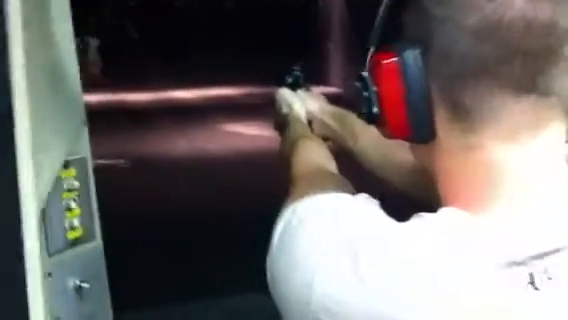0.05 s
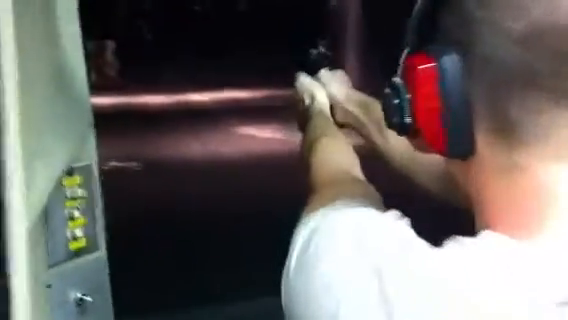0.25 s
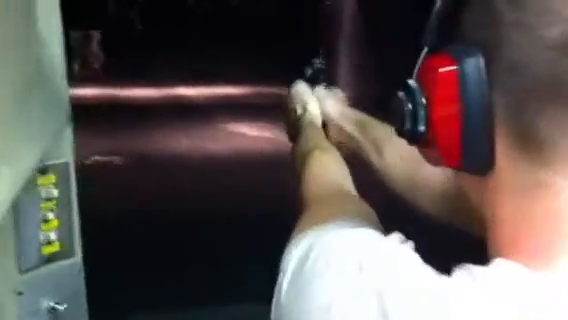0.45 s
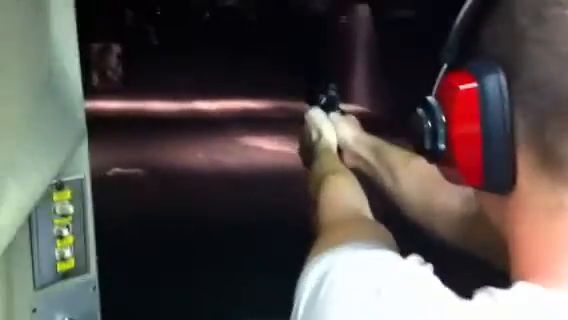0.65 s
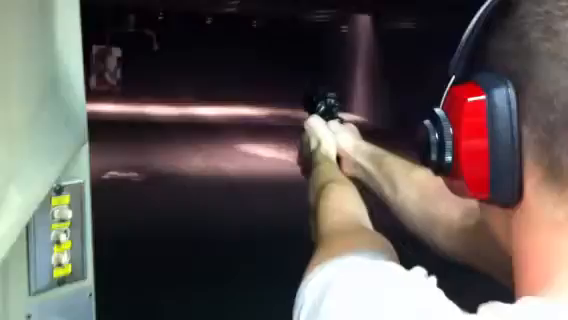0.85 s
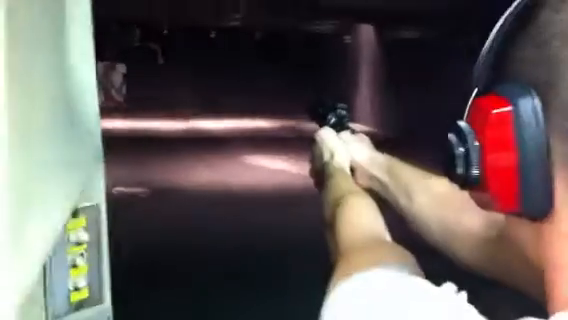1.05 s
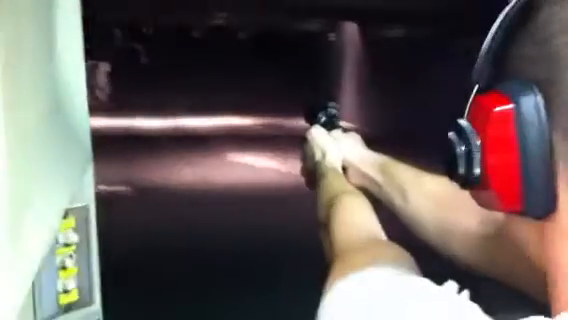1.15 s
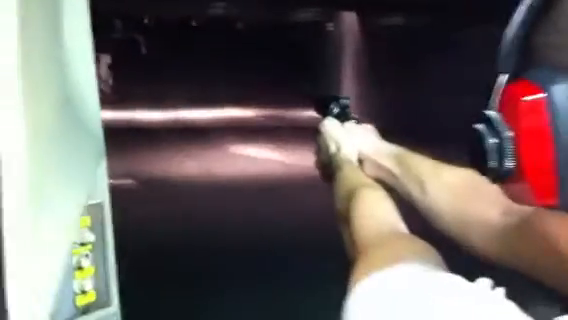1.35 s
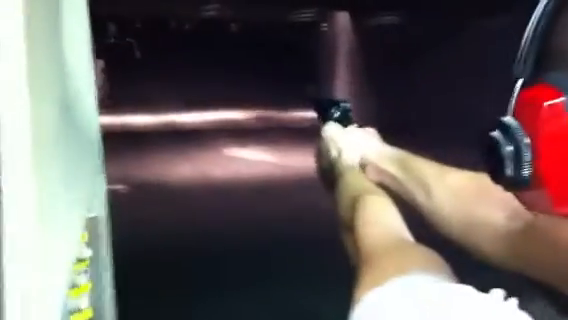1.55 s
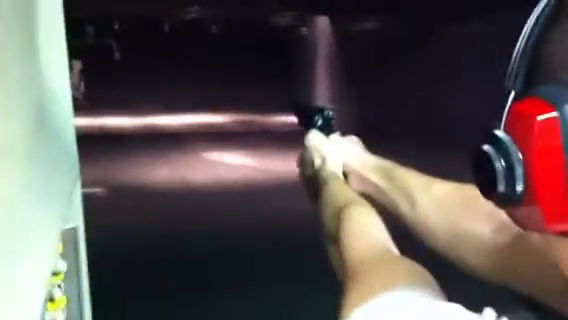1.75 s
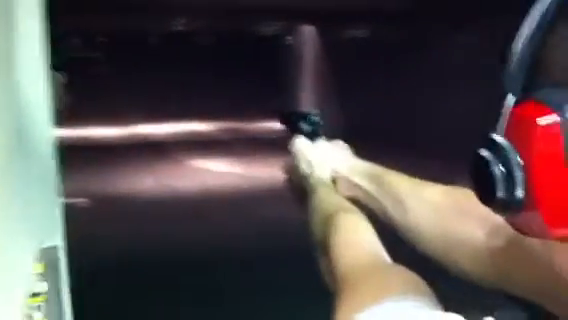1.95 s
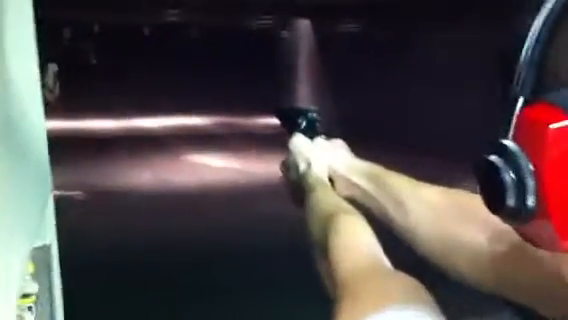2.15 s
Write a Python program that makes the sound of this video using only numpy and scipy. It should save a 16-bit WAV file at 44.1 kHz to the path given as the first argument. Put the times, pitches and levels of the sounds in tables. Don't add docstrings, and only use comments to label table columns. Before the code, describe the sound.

A single handgun shot in a long concrete indoor range, heard close on an overloaded phone microphone. Low ventilation hum runs throughout. Steel lock parts tick at about 0.19-0.24 s, then the blast cracks at 0.24 s. A bright backstop echo follows near 0.37 s; the fluttering roar decays into hollow low-mid tones. Faint brass case bounces tinkle from 1 s, with clearer ticks around 1.75 s.

```python
import sys
import numpy as np
from scipy import signal
from scipy.fft import irfft
from scipy.io import wavfile
from scipy.ndimage import uniform_filter1d

SR = 44100
rng = np.random.default_rng(int(sys.argv[2]) if len(sys.argv) > 2 else 0)


def makeup_ratio(level_db):
    decades = np.asarray(level_db, float) / 20
    return 10 ** decades


def inscribe(sig):
    pcm = np.round(np.clip(np.atleast_2d(sig).T, -1, 1) * 32767)
    wavfile.write(sys.argv[1], SR, pcm.astype(np.int16))


N = 97020

SHOT_S = 0.2425
BUILD_S = 0.17


def unit(x):
    return x / np.sqrt(np.mean(x ** 2))


def read(table, hz):
    rows = np.array(table)
    return np.interp(np.log(hz), np.log(rows[:, 0]), rows[:, 1])


def band(hz, width, lines_db=0.0):
    f = np.fft.rfftfreq(N, 1 / SR)
    cells = rng.standard_normal(SR // 4)[(f / 6).astype(int)]
    real, imaginary = rng.standard_normal((2, len(f)))
    bell = np.exp(-0.5 * ((f - hz) / width * 2) ** 2)
    return unit(irfft((real + 1j * imaginary) * makeup_ratio(lines_db * cells) * bell, N))


def walk(rate):
    k = int(SR / rate)
    x = np.repeat(rng.standard_normal(N // k + 1), k)
    for _ in range(2):
        x = uniform_filter1d(x, k)
    return unit(x[:N])


def fade(since, t60):
    return (since >= 0) * np.exp(-np.log(1000) * np.maximum(since, 0) / t60)


def struck(times, db, t60):
    kicks = np.zeros(N)
    kicks[(times * SR).astype(int)] = makeup_ratio(db)
    return signal.lfilter([1], [1, -np.exp(-np.log(1000) / (t60 * SR))], kicks)


# frequency in Hz, level in dB per Hz.
AIR_RUSH = [(40, -30.5), (90, -13), (150, -5.5), (320, -14), (450, -20.5), (1000, -24.5), (3000, -37),
            (16000, -45)]
# frequency in Hz, width in Hz, level in dB.
DUCT_HUMS = [(150, 16, -60.5), (228, 18, -65), (311, 52, -57), (465, 14, -68.5)]


def ventilation():
    air = 0
    for hz in 40 * 2 ** (np.arange(18) / 2):
        level_db = read(AIR_RUSH, hz) + 10 * np.log10(hz) + 0.86 * walk(21)
        air = air + makeup_ratio(level_db) * band(hz, hz / 2)
    out = makeup_ratio(-56) * unit(air)
    for hz, width, db in DUCT_HUMS:
        out = out + makeup_ratio(db + 0.89 * walk(11)) * band(hz, width)
    return out


# frequency in Hz, level in dB, time to fade 60 dB in seconds, wavering in Hz.
CASE_TONES = [(6160, -16, .4, 80), (7102, -14, 0.44, 40), (8140, -8, 0.46, 35), (9730, -1, 0.41, 70),
              (11920, -1.5, .7, 140), (12390, -4, .7, 90), (14010, -14, .3, 40)]
# time in seconds, ring level in dB, tick level in dB.
CASE_BOUNCES = [(.98, -76, -86.5), (1.14, -82, -80), (1.219, -76, -80), (1.34, -86, -84), (1.46, -76, -90),
                (1.54, -73, -82), (1.65, -84, -82), (1.736, -83, -64.5), (1.77, -87, -71),
                (1.80, -91, -69.5), (1.83, -89, -73), (1.959, -80, -88)]


def case():
    times, ring_db, tick_db = np.array(CASE_BOUNCES).T
    shares = rng.standard_normal((len(CASE_TONES), len(CASE_BOUNCES)))
    rattle = band(8000, 12000) + 0.25 * band(4400, 800)
    out = struck(times, tick_db, 0.25) * rattle
    for (hz, db, t60, width), share in zip(CASE_TONES, shares):
        out = out + struck(times, ring_db + db + 3 * share, t60) * band(hz, width)
    return out


# time in seconds, rattle level in dB, ring level in dB,
# time the rattle fades 60 dB in seconds.
EARLY_TICKS = [
    (.191, -45, -40, 0.45),
    (0.219, -41, -51.5, .12),
    (0.232, -16, -42.5, .02),
    (0.2395, -20, -30.5, 0.022),
]


def early_ticks(t):
    hold_s, stop_s, ring_t60_s = 0.023, 0.003, 0.08
    bright = band(4000, 16000)
    ring = np.sin(2 * np.pi * 12440 * t) + 0.4 * band(1470, 250)
    out = 0
    for at, db, ring_db, t60 in EARLY_TICKS:
        rattle = makeup_ratio(db) * bright * fade(t - at, t60)
        ringing = makeup_ratio(ring_db) * fade(t - at, ring_t60_s) * ring
        stopped = np.clip((at + hold_s - t) / stop_s, 0, 1)
        out = out + (rattle + ringing) * stopped
    return out


# frequency in Hz, level in dB, time to fade 60 dB in seconds.
WALL_TONES = [(117.6, -23, 2.2), (181, -14, 1.3), (287, -12.5, 1.55), (397, -15.5, 1.6),
              (446.6, -11.5, 1.7), (518.3, -20, 2.3), (552, -18, 1.3), (596, -22, 2.4), (650, -18, 0.81),
              (715.5, -17, 2.29), (741, -21, 2.0), (756.7, -6, 1.0), (1070, -28, 2.45), (1230, -31.5, 1.6)]


def standing_waves(s):
    build = 1 - np.exp(-np.maximum(s, 0) / BUILD_S)
    out = 0
    for hz, db, t60 in WALL_TONES:
        tone = np.sin(2 * np.pi * (hz * s + rng.random()))
        out = out + makeup_ratio(db + 0.86 * walk(8.2)) * build * fade(s, t60) * tone
    return out


# frequency in Hz, level in dB.
HALL_LEVEL = [(60, -42), (150, -6), (300, 2), (600, 7.5), (1200, 2.5), (2000, 5.5), (3200, 3), (5000, 5.5),
              (15000, -1.5)]
# frequency in Hz, time to fade 60 dB in seconds.
HALL_FADE = [(60, 1), (150, 1.2), (300, 1.394), (600, 1.448), (1200, 0.86), (2500, 0.75), (6000, .52),
             (15000, 0.51)]
# frequency in Hz, level against the main one in dB.
FAR_LEVEL = [(60, -35), (300, -31), (700, -19), (1500, -25), (3000, -27), (5000, -33), (8000, -45),
             (15000, -56)]


def reverberation(s):
    build_hz, direct_share = 875, 0.25
    boom_db, boom_s = 0.5, 0.1
    backstop_s, backstop_db, rise_s, fall_s = 0.125, 9, 0.012, 0.012
    late = np.maximum(s, 0)
    e = np.maximum(s - backstop_s, 0)
    echo = makeup_ratio(backstop_db) * (1 - np.exp(-e / rise_s)) * np.exp(-e / fall_s)
    boom = makeup_ratio(boom_db) * np.exp(-(late / (2 * boom_s)) ** 3)
    flutter = np.cos(2 * np.pi * 24.06 * s + 1.4)
    out = 0
    for hz in 50 * 2 ** (np.arange(26) / 3):
        low = 1 / (1 + (hz / build_hz) ** 3)
        gather_s = BUILD_S * low ** 1.5 + 2e-4
        build = 1 - (1 - direct_share) * np.exp(-(late / gather_s) ** 2)
        main = fade(s, read(HALL_FADE, hz)) * (1 + echo * (1 - low) + low * boom)
        patchy = makeup_ratio(0.5 * walk(14) + 2 * low * flutter)
        far = makeup_ratio(read(FAR_LEVEL, hz)) * fade(s, 2.905 * (hz / 700) ** -0.075)
        roar = band(hz, hz / 4) * main * patchy
        tail = band(hz, hz / 4, lines_db=3) * far
        out = out + makeup_ratio(read(HALL_LEVEL, hz) - 13) * build * (roar + tail)
    return out


def blast(s):
    length_s = 0.00015
    return makeup_ratio(12.5) * (1 - 2 * s / length_s) * ((s >= 0) & (s < length_s))


def shot(t):
    s = t - SHOT_S
    return blast(s) + reverberation(s) + standing_waves(s)


def scene():
    t = np.arange(N) / SR
    no_deep_bass = signal.butter(3, 100, "high", fs=SR, output="sos")
    hall = signal.sosfilt(no_deep_bass, shot(t))
    return (hall + early_ticks(t) + case() + ventilation())[None]


# frequency in Hz, limit against the whole sound in dB.
TREBLE_LIMIT = [(5000, -80), (7000, -62), (11600, -59), (12300, -66), (12700, -51), (16000, -50)]


def mask(x):
    f, _, z = signal.stft(x, SR, nperseg=1024)
    frames = z.shape[1]
    centre_hz = f[4:512:8]
    power = np.abs(z[:512].reshape(64, 8, -1) ** 2).sum(axis=1) + 1e-18
    spread = rng.standard_normal((64, frames // 3 + 1)).repeat(3, axis=1)[:, :frames]
    limit_db = read(TREBLE_LIMIT, centre_hz)[:, None] + 8 * spread
    strong = power > power.sum(axis=0) * makeup_ratio(2 * limit_db)
    below_treble = centre_hz[:, None] < TREBLE_LIMIT[0][0]
    z[:512] *= np.repeat(strong | below_treble, 8, axis=0)
    return signal.istft(z, SR)[1][:N]


def band_limit(x):
    return signal.sosfilt(signal.butter(12, 16620, fs=SR, output="sos"), x)


def record(dry):
    ceiling, knee, offset = 0.54, 4.6, 0.0002
    x = dry / (1 + np.abs(dry / ceiling) ** knee) ** (1 / knee)
    coupling = signal.butter(1, [110, 13000], "band", fs=SR, output="sos")
    x = signal.sosfilt(coupling, x) + offset
    x = signal.sosfilt(signal.ellip(8, 0.2, 60, 15800, fs=SR, output="sos"), x)
    mix = mask(x[0])[None]
    return band_limit(mix)


dry = scene()
out = record(dry)
inscribe(out)
```